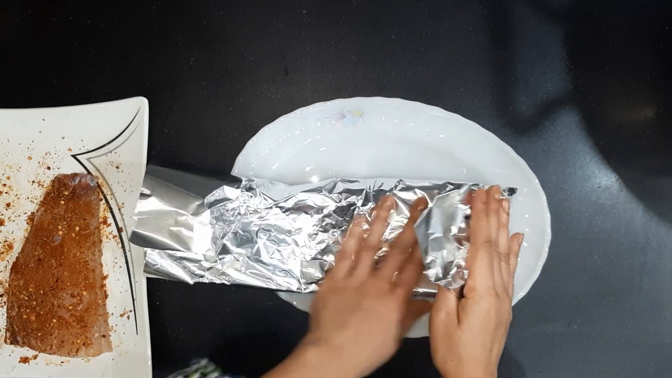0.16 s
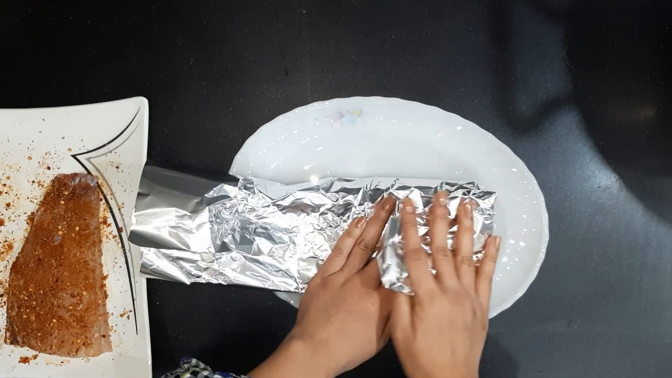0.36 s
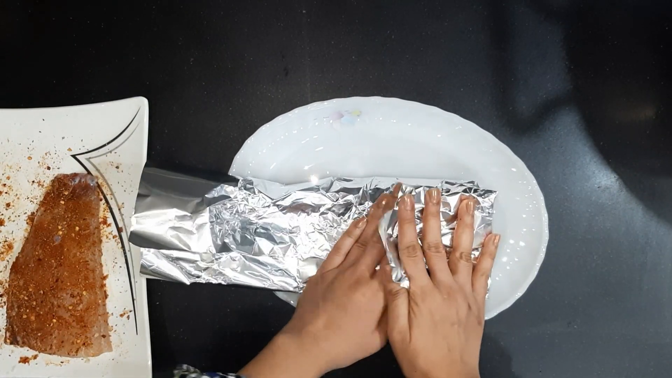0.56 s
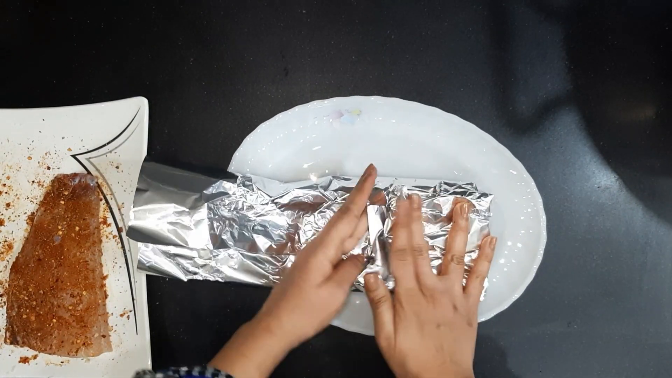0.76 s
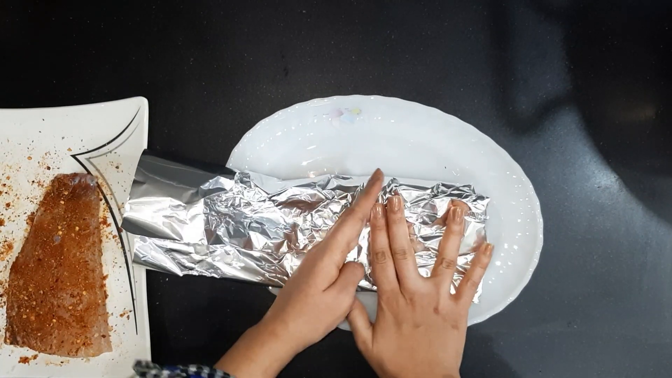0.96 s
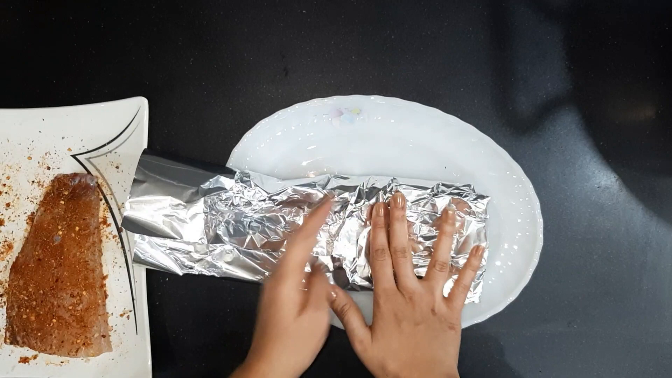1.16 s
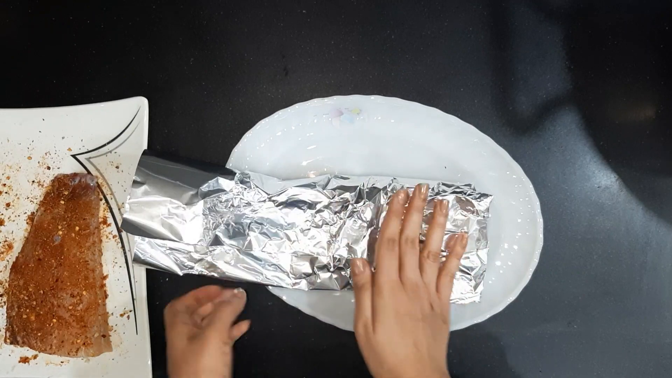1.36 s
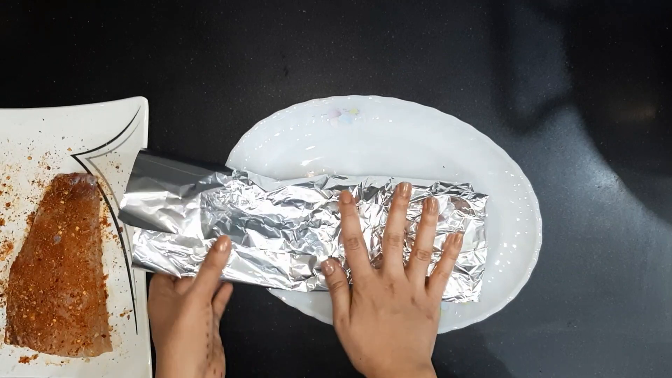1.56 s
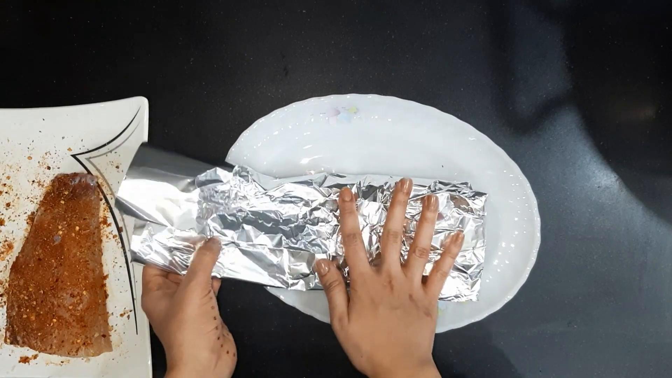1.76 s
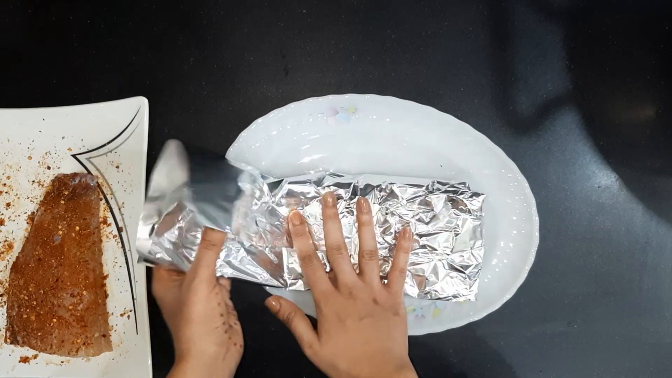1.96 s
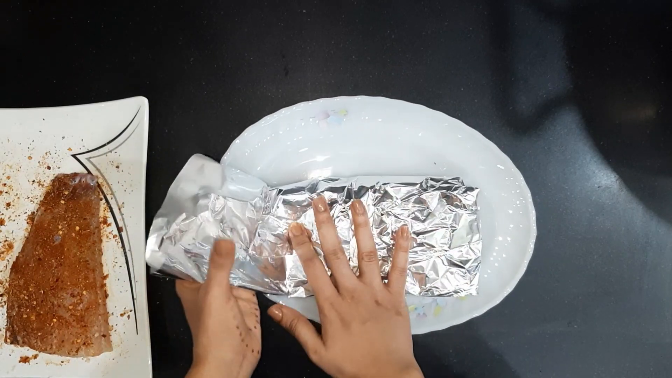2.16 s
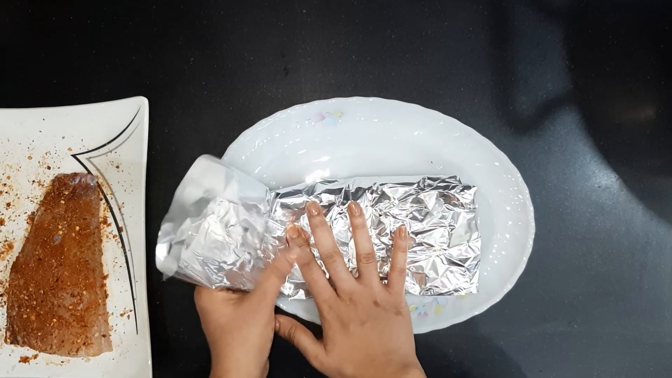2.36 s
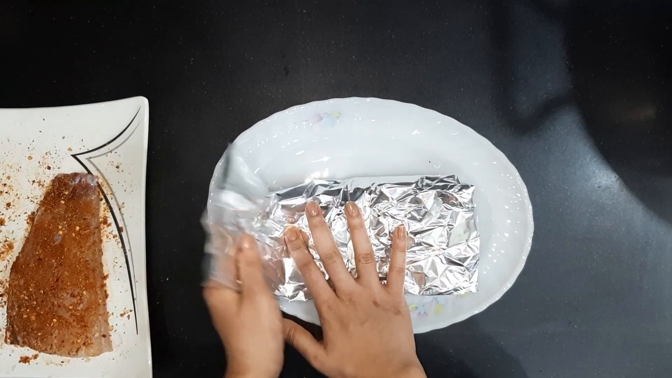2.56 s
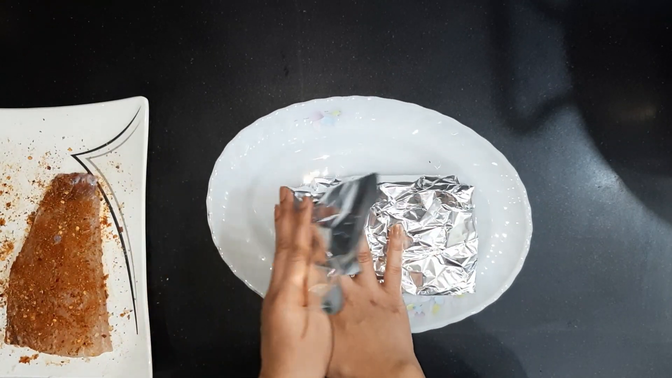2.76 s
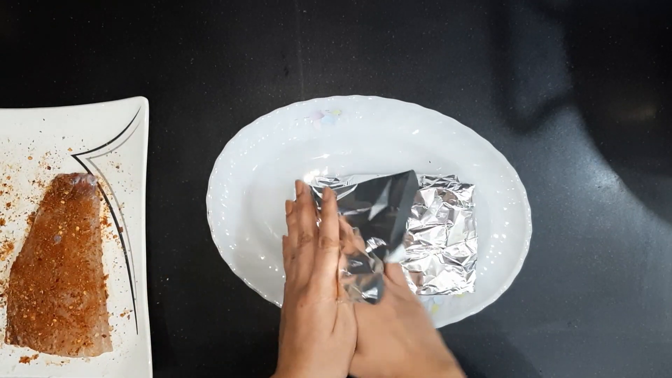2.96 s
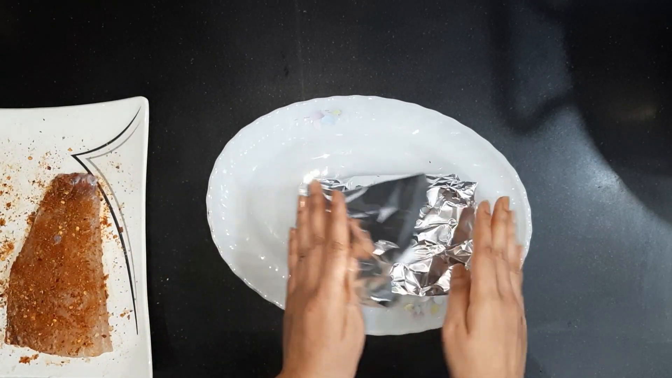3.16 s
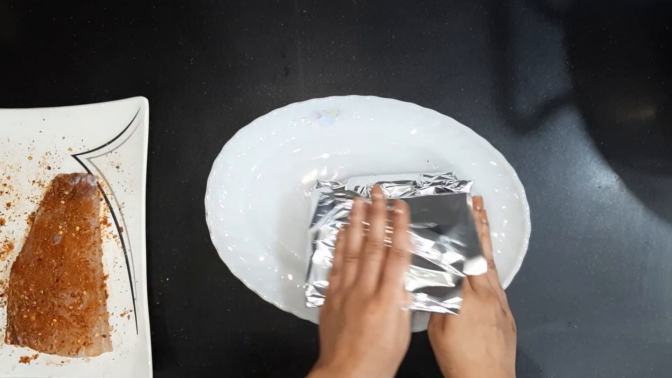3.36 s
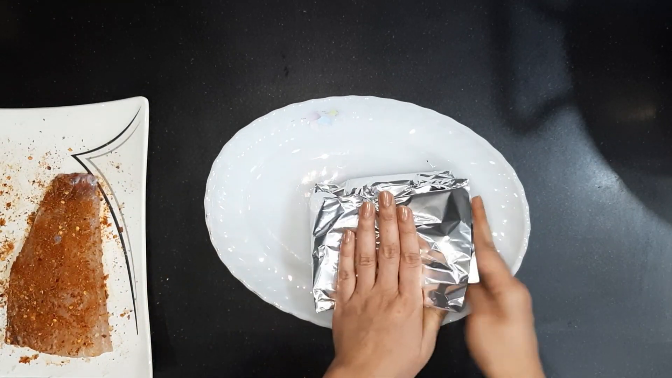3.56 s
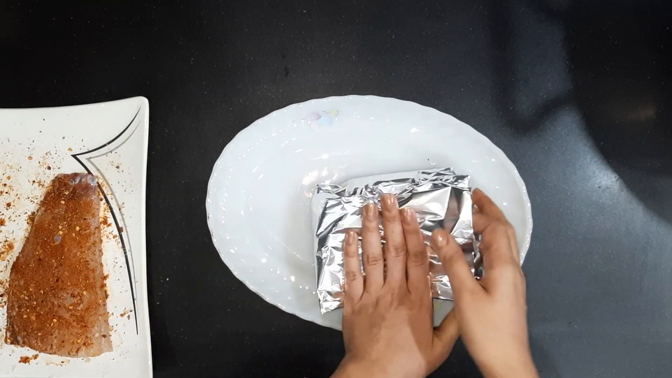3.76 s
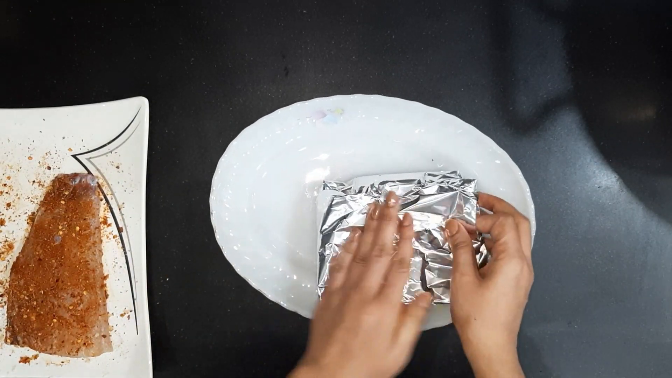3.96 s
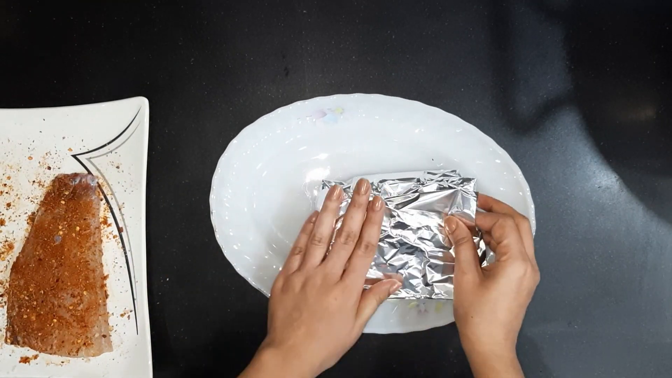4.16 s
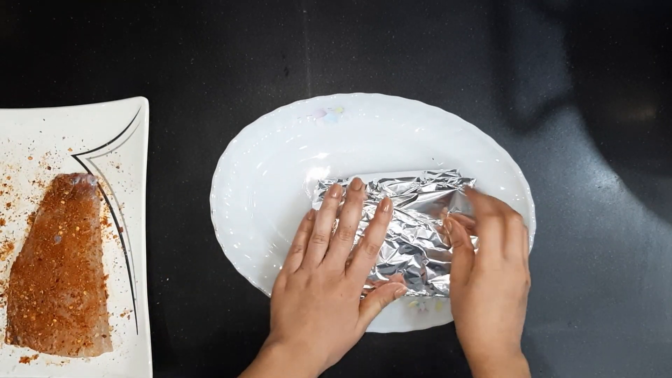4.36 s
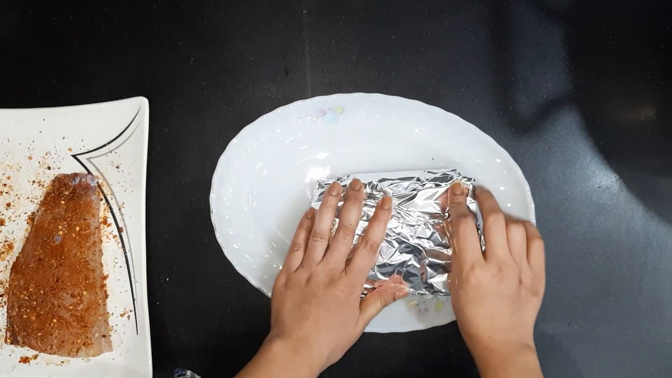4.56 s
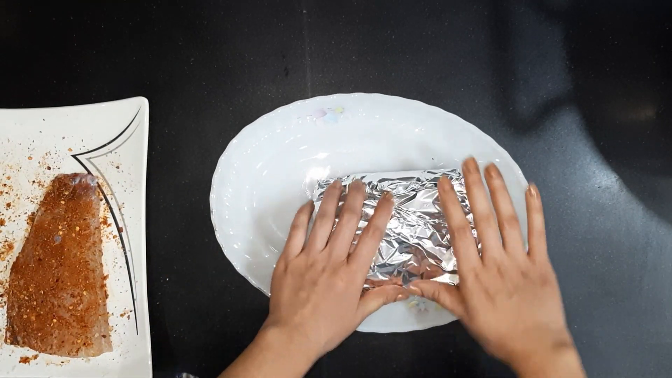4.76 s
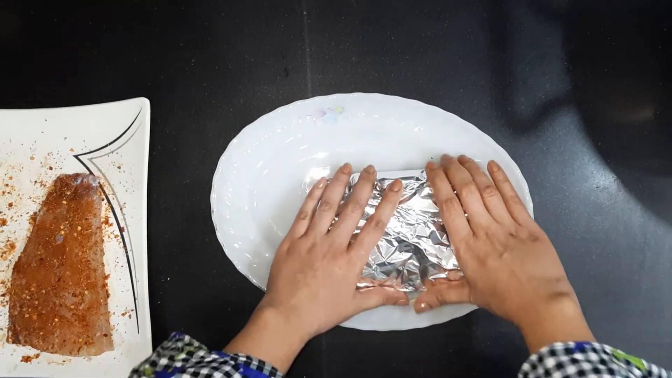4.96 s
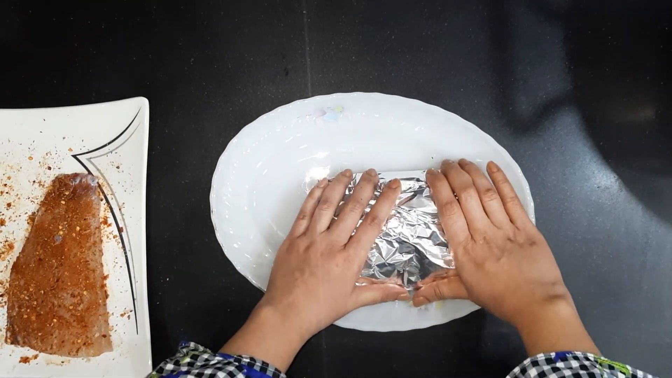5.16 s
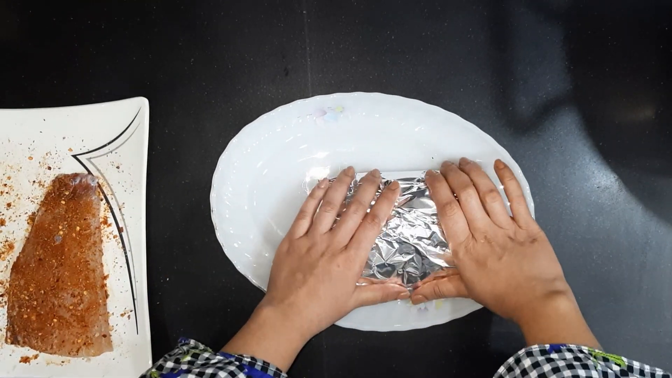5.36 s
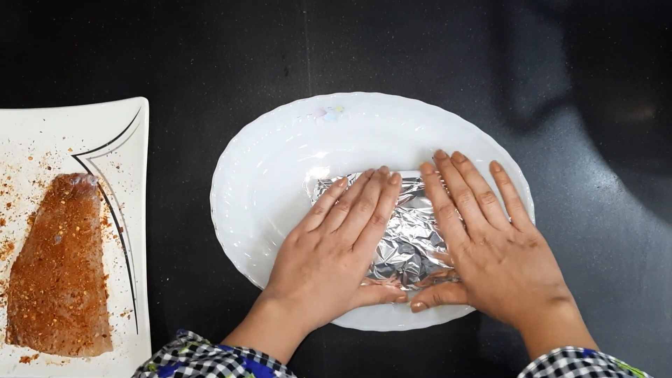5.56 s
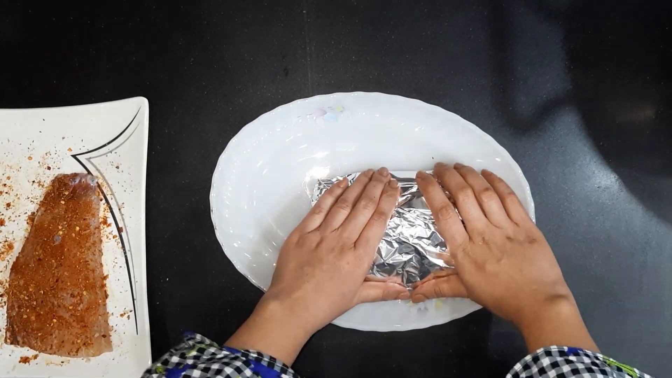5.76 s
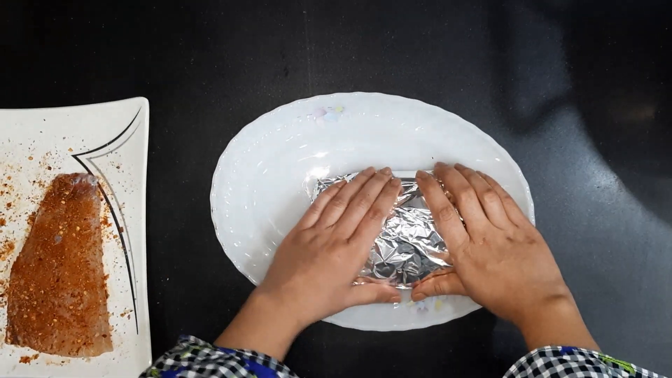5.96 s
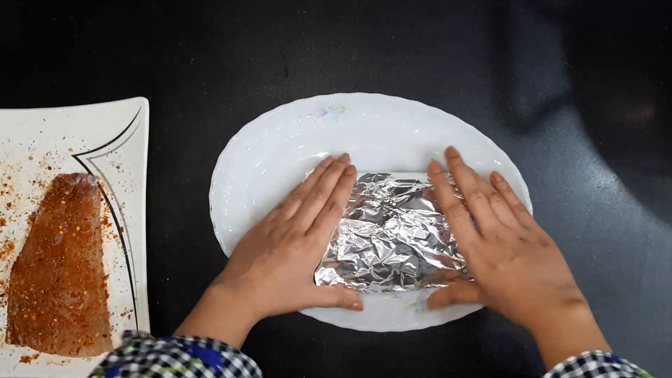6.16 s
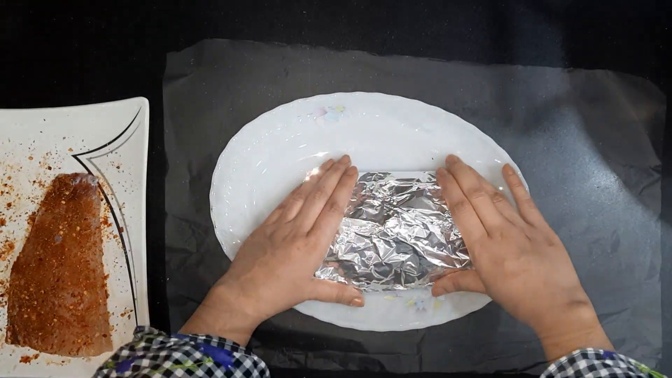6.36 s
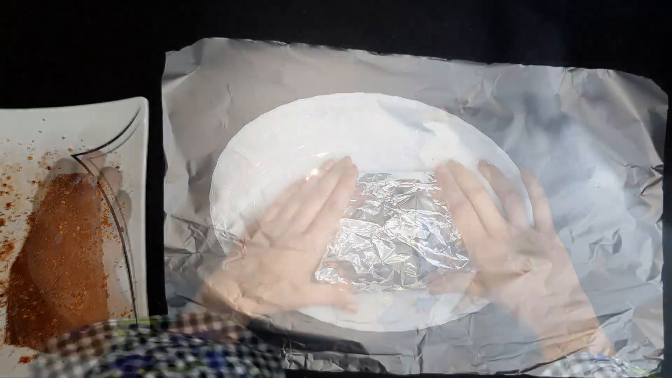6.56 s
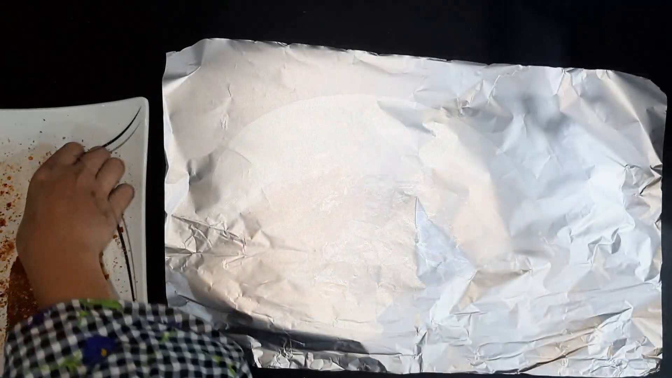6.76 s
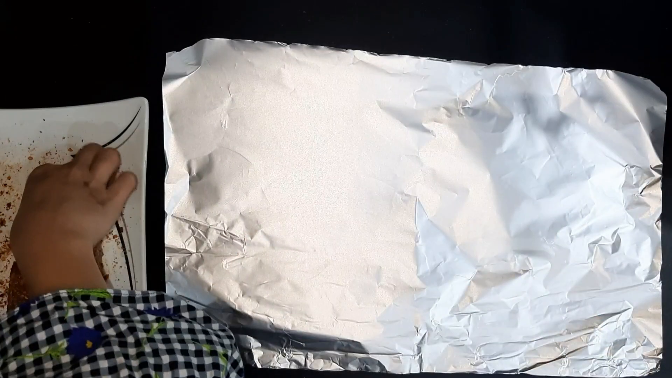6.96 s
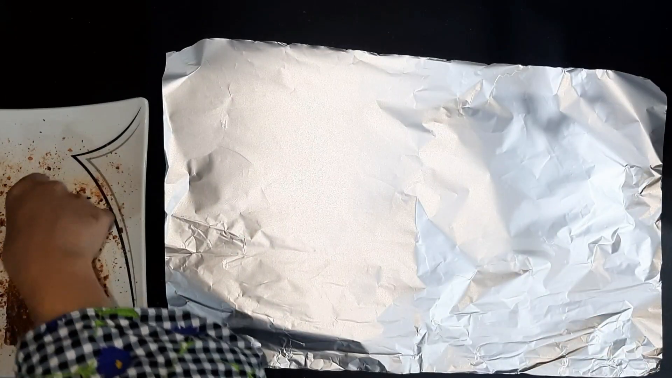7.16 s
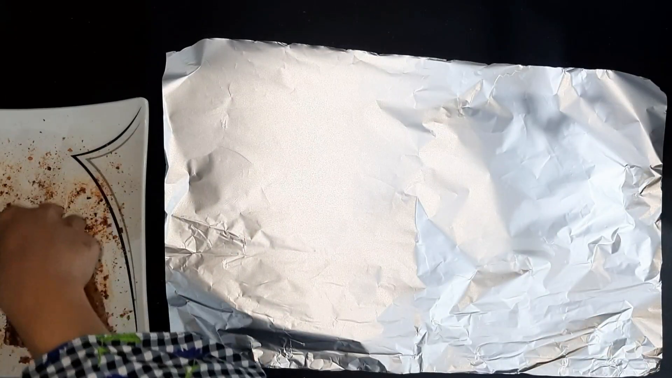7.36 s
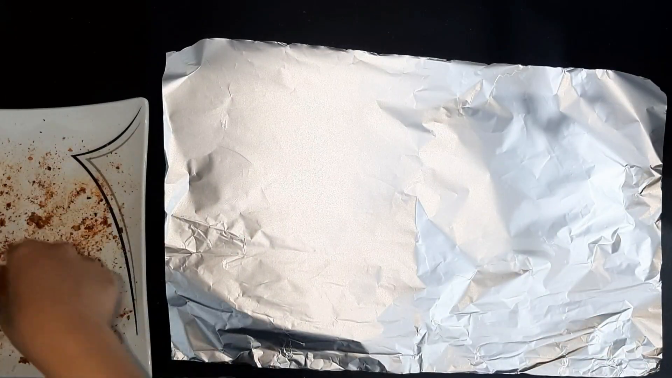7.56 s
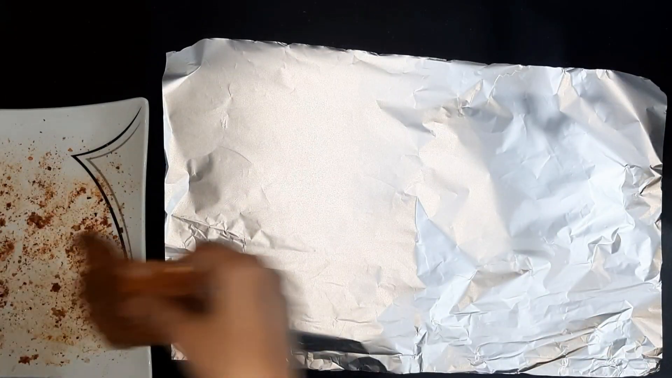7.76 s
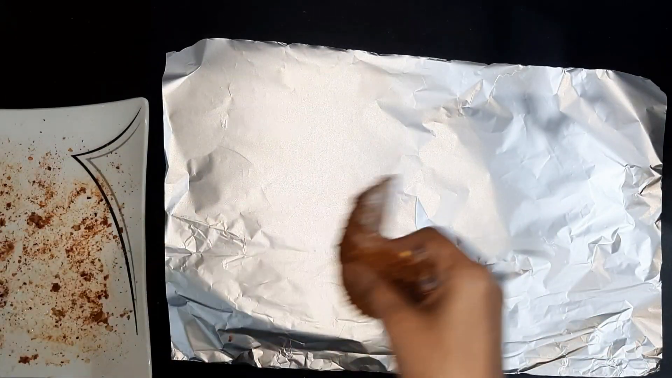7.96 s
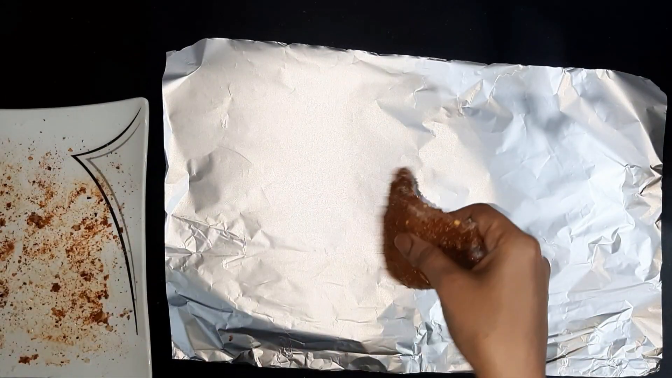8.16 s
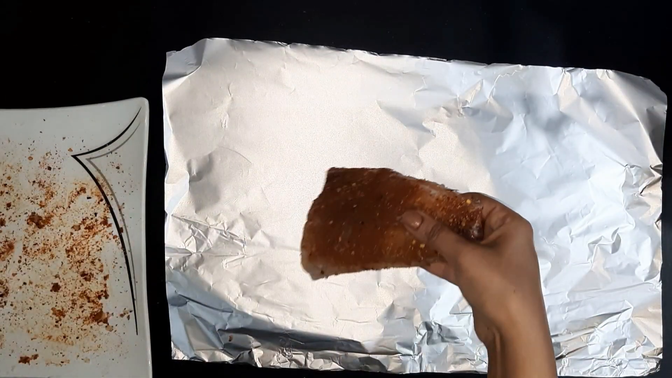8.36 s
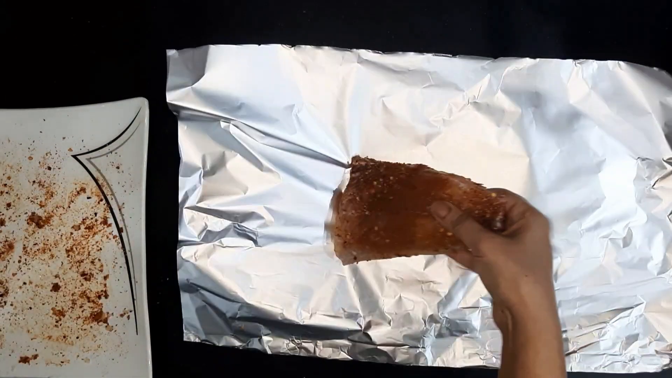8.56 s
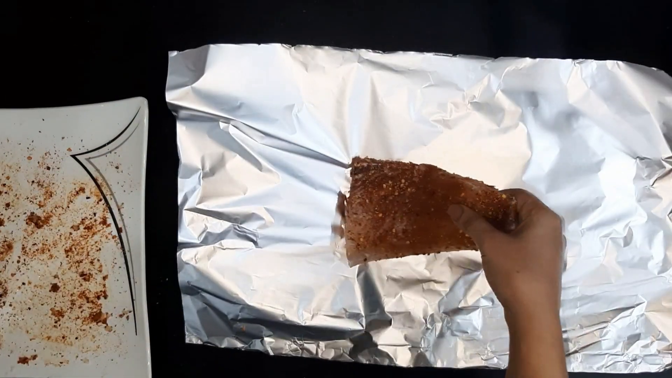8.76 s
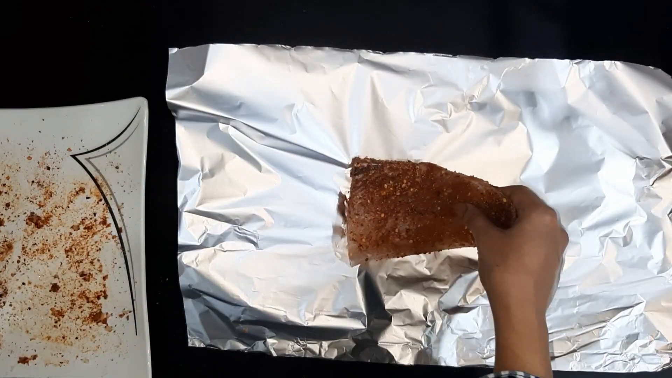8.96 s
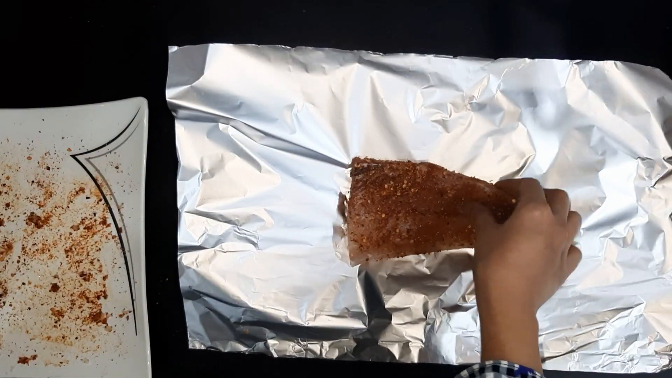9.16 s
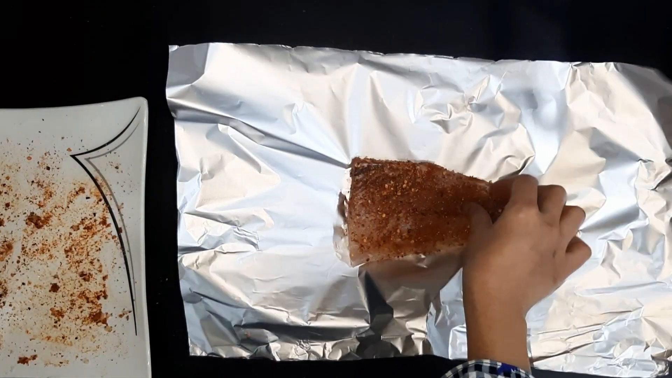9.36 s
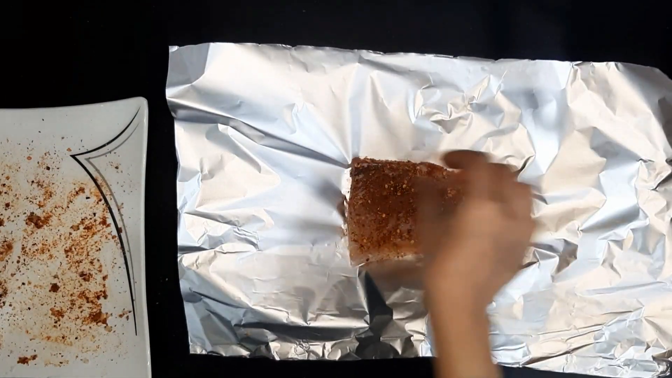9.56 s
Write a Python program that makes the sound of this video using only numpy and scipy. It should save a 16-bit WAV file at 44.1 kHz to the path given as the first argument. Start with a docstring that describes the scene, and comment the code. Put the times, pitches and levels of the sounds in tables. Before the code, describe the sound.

A close microphone in a hard, lightly echoing kitchen, with a soft low appliance rumble, room hiss and faint wavering hum throughout. From 0 to about 5 seconds hands fold and press foil: dense, bright crinkles swell and fade, strongest near 0.3, 1.9, 2.5 and 3.4 seconds, scattered with dry snaps and a few soft low pats. Around 5.1 seconds a short, low groan comes from further off. The rustling thins to light ticks and fades by 6.9. At 7.0-7.3 a dish rocks and knocks on the worktop in a quick chatter, and again at 7.6-7.7, hollow and ceramic. A distant smack at 7.8 dies away in diffuse echo. After a short lull, food drops onto a flat foil sheet at 8.45 with the loudest, sharpest crackle and a faint thump; brighter crackles and snaps continue, weakening until 9.5.

```python
"""Hands fold and press foil round food on a plate in a hard-walled kitchen: clumped noise bursts and lone snaps,
with soft low pats, over an appliance of rumbling noise and faint wavering sines that runs throughout.
Later a low groan of resonant noise comes from further off, then a dish rocks and knocks on the worktop, its modes
struck and chattering. One distant smack follows as fading noise; last, food drops on a fresh flat sheet,
which crackles and snaps on. Foil and dish also feed diffuse echoes."""
import sys
import numpy as np
from scipy import signal
from scipy.fft import rfft, irfft
from scipy.io import wavfile
from scipy.ndimage import uniform_filter1d

SR = 44100
rng = np.random.default_rng(int(sys.argv[2]) if len(sys.argv) > 2 else 0)


def dump_mix(stems):
    """Bounce the given channels to the path in sys.argv[1] as a 16-bit WAV at rate SR."""
    frames = np.atleast_2d(stems).T  # one column per channel
    limited = np.clip(frames, -1, 1)  # hard clip at full scale
    pcm = np.round(limited * 32767).astype(np.int16)
    wavfile.write(sys.argv[1], SR, pcm)


N = 423800   # length in samples

# Levels in the tables are relative: the functions trim and mix them. Spectra are shapes, set to rms 1 in colour().
# background noise level over time: [t/s, level/dB]
BACKGROUND_LEVEL = [(0.0, -44.5), (5.5, -46), (6.9, -47.5), (7.0, -43.5), (8.9, -47), (9.61, -49.5)]
# spectrum of the appliance's motor rumble: [f/Hz, level/dB]
MOTOR_SPECTRUM = [(15, -32), (25, -56), (42, -5.5), (76, -4.5), (108, 4), (124, 3.5), (162, -28),
                  (180, -10.5), (230, -38), (400, -120)]
# spectrum of the broad room tone: [f/Hz, level/dB]
ROOM_TONE_SPECTRUM = [(100, -40.5), (170, -5.5), (249, -5.5), (364, -5), (392, -13), (423, -8), (1140, -14),
                      (7340, -34.5), (9220, -36), (16000, -41)]
# the appliance's steady hum and whine lines: [f/Hz, level/dB]
HUM_LINES = [(99.6, -77), (199, -65.5), (247.6, -63), (398, -64.5), (1631, -73), (5405, -97), (6525, -78),
             (6821, -77), (8947, -73.5), (10813, -76), (12059, -80), (12853, -89)]
# folds and presses of the hands: [peak t/s, crackle level/dB, swell t/s, fade t/s, body level over crackle/dB]
FOIL_PRESSES = [(0.01, -31.5, 0.11, 0.08, -15), (0.091, -25.5, 0.11, 0.21, -6),
                (0.212, -25.5, 0.032, 0.21, -6), (0.328, -20, 0.047, 0.14, -4.5),
                (0.46, -30.5, 0.25, .4, -7.5), (0.69, -25.5, 0.36, 0.063, -5.5),
                (0.74, -33, 0.034, .1, -16), (0.84, -30.5, 0.32, 0.14, -5),
                (0.951, -29, 0.089, 0.097, -4.5), (1.15, -37, 0.13, 0.21, -7),
                (1.224, -30.5, 0.08, 0.068, -4.5), (1.415, -35, 0.02, .12, -9), (1.57, -31, .05, 0.069, -6),
                (1.5, -35, .08, .2, -6), (1.66, -34, 0.11, 0.24, -6.5), (1.79, -30.5, 0.31, 0.14, -6.5),
                (1.849, -21.5, 0.095, 0.023, -7), (1.958, -19, 0.15, 0.15, -5.5),
                (2.21, -35.5, 0.15, 0.11, -4), (2.42, -32, 0.026, 0.44, -1.5),
                (2.53, -21.5, 0.16, 0.18, -8), (2.66, -26.5, 0.046, 0.2, -3.5),
                (2.839, -24, 0.03, 0.067, -13), (3.009, -31.5, .3, 0.2, -6), (3.24, -29, 0.055, 0.16, -8),
                (3.42, -20.5, 0.13, 0.16, -2.5), (3.55, -31.5, .3, 0.28, 1.5),
                (3.669, -25.5, 0.073, 0.27, -7), (3.871, -26, 0.036, 0.16, -4), (3.95, -34, 0.51, 0.95, -7),
                (4.241, -23.5, 0.075, 0.32, -6.5), (4.86, -28, .09, 0.12, -5.5), (5.05, -35, 0.24, 1, -6),
                (5.44, -59, 0.13, .17, -12), (5.54, -38, 0.036, 0.14, -24), (5.749, -41.5, 0.027, 0.24, -7),
                (5.88, -47, 0.16, 0.34, -3), (6.06, -42.5, .15, 0.077, -9), (6.2, -35, .15, 0.1, -6),
                (6.4, -46, 0.18, 0.19, -1), (6.61, -48.5, .03, 0.22, -2.5), (6.89, -53, 0.15, 0.045, -0.5),
                (7.25, -46.5, 0.16, 0.22, -22), (7.5, -45, 0.092, 0.045, -22),
                (8.452, -10, 0.0056, .2, -13.5), (8.51, -8, 0.042, 0.045, -12.5),
                (8.55, -37, 0.032, .1, -5.5), (8.625, -26.5, .04, .12, -9),
                (8.708, -21.5, 0.014, 0.078, -13), (8.76, -16.5, 0.025, 0.11, -16),
                (8.84, -24.5, .05, 0.072, -8.5), (8.93, -38.5, 0.037, 0.069, -8),
                (9, -27.5, 0.068, 0.065, -8), (9.1, -27.5, .06, 0.12, -8), (9.195, -25.5, .04, 0.13, -14),
                (9.35, -30.5, .085, 0.095, -6.5), (9.29, -43, 0.043, .1, 2), (9.42, -49, .05, .05, 3),
                (9.487, -36.5, .03, 0.08, -2)]
# treble of the crumpled parcel: [f/Hz, level/dB]
PARCEL_SPECTRUM = [(880, -20.5), (1500, -11), (3090, -3.5), (9130, -8.5), (12300, -13), (15100, -23),
                   (16000, -48), (16500, -77)]
# treble of the fresh flat sheet: [f/Hz, level/dB]
SHEET_SPECTRUM = [(880, -44), (1500, -3), (1590, -7), (2910, -5.5), (6110, -5), (12100, -10), (15700, -26),
                  (16500, -13.5)]
# low body under both: [f/Hz, level/dB]
BODY_SPECTRUM = [(180, -45.5), (260, -17), (340, -6.5), (430, -13), (520, -9.5), (950, -1.5), (1080, 1.5),
                 (1300, -2), (1800, -4.5), (2600, -15.5), (4000, -81)]
# lone creases that snap: [t/s, level/dB, body level over treble/dB, favoured f/Hz]
CREASE_SNAPS = [(0.0383, -18, -25, 8940), (0.083, -18.5, -17, 7400), (0.1962, -12, -9, 1670),
                (0.2507, -20, -13, 3500), (0.31, -16, -20, 4210), (0.3224, -12, -4, 1500),
                (0.5092, -23, -30, 4730), (0.549, -25, -20, 4600), (0.5926, -22, -25, 2190),
                (0.636, -19, 7.5, 5200), (0.678, -15, -19, 8850), (0.7334, -16.5, -16, 2130),
                (0.828, -22, -10.5, 2150), (0.893, -22.5, 3, 2540), (0.939, -21, -8, 7300),
                (1.2166, -18.5, -20, 2830), (1.4054, -38, 11, 4940), (1.566, -21.5, -26, 6740),
                (1.6405, -19.5, -25, 4660), (1.6834, -19.5, -1, 4870), (1.7654, -15.5, -11, 1790),
                (1.8264, -15, -4, 2150), (1.9162, -13, -3, 1500), (2.0, -14.5, 5.5, 1500),
                (1.9766, -15, -8, 3280), (2.028, -13.5, -12, 1660), (2.11, -21.5, -31, 8650),
                (2.147, -24.5, -24, 7000), (2.215, -20, -27, 6170), (2.269, -23.5, -27, 6160),
                (2.397, -21.5, -16, 4300), (2.474, -20, -13, 1500), (2.5131, -11.5, -18, 7100),
                (2.564, -12.5, -1, 1640), (2.6482, -18.5, 8.5, 2000), (2.6854, -14.5, -17, 1730),
                (2.7257, -19.5, -23, 5650), (2.7728, -20, 2, 2060), (2.8439, -21, -24, 4220),
                (2.8987, -20, 0, 2000), (3.0021, -15.5, -2, 1960), (3.1113, -19, -27, 6940),
                (3.2405, -20, -18, 2620), (3.318, -17.5, -10, 1850), (3.3857, -14.5, -17, 2180),
                (3.431, -22, 0, 4020), (3.4768, -13.5, 9, 2570), (3.546, -19, -15, 2770),
                (3.657, -23, -2, 4900), (3.695, -18.5, 2, 4830), (3.763, -20, -19, 2060),
                (3.8478, -32, 11, 1720), (3.911, -19, 2.5, 1640), (3.9434, -19, 6, 1820),
                (3.9873, -24, -20, 4140), (4.1002, -20.5, -10, 1940), (4.1372, -18, -4, 1800),
                (4.159, -24, -22, 9000), (4.2172, -17.5, 6, 2060), (4.345, -34, 6, 1700),
                (4.382, -16.5, -28, 6100), (4.4575, -17, 2, 1700), (4.5483, -20, -2, 6150),
                (4.5745, -26, -15.5, 4800), (4.6103, -20, 1, 2020), (4.6368, -22.5, -17, 2660),
                (4.669, -22.5, -3, 9800), (4.738, -24, -4, 1660), (4.8134, -24, -12, 3020),
                (4.8552, -20, -22, 2150), (4.98, -26, -7, 4700), (5.057, -16.5, -4, 4900),
                (5.13, -27, 2, 3870), (5.1618, -20.5, -20, 3870), (5.194, -17, -0.5, 1450),
                (5.2886, -34, 9, 2040), (5.5207, -24.5, 10.5, 1510), (5.53, -26.5, -27, 8100),
                (5.6381, -38, -16, 8850), (5.724, -23, -5.5, 5240), (5.76, -18.5, -30, 4350),
                (5.84, -30.5, -3, 4080), (5.8735, -18.5, -11, 1510), (5.909, -29, -30, 9600),
                (6.1, -44, 18, 2210), (6.1265, -28.5, -11, 1900), (6.201, -28, -19, 4000),
                (6.338, -37, -24, 6100), (6.3579, -36, -16, 3150), (6.3963, -29.5, 1, 6960),
                (6.471, -34.5, -23, 4630), (6.608, -35.5, 0, 1620), (6.6368, -41, -14, 1790),
                (6.6772, -46, 8.5, 3870), (6.8774, -36, -11, 9520), (8.4505, -6.5, -17, 6300),
                (8.4617, -6, -4, 5570), (8.4998, -7, -13, 5300), (8.756, -17, -5, 6180),
                (8.8245, -25, -7, 5930), (8.9198, -23.5, -23, 7200), (8.978, -20, -6, 1620),
                (9.0573, -31, -11, 5000), (9.0785, -20, -15, 1770), (9.1326, -21.5, 3, 6100),
                (9.183, -20, -7, 4840), (9.3393, -21.5, -19, 7440), (9.481, -26, -10, 2320)]
# a palm pats the parcel down, or the food lands: [t/s, level/dB]
PARCEL_PATS = [(0.325, -27), (2.648, -30), (3.476, -29), (8.5, -29.5)]
# dish on worktop: [t/s, level/dB, middle modes over body/dB, treble over body/dB]
DISH_KNOCKS = [(7.014, -23, -7.5, -7.5), (7.063, -26, -9, -9), (7.107, -21, -13, -9),
               (7.142, -12, -9, -3.5), (7.167, -25.5, -2, 0.5), (7.191, -28, -17, -13),
               (7.223, -43, -20, -21), (7.27, -53, -18, -15), (7.579, -14.5, -12, -3.5),
               (7.624, -20.5, -11, -13), (7.655, -23.5, -14, -14), (7.677, -27, -12, -17),
               (7.719, -38, -7, -8)]
# ringing modes of the dish: [f/Hz, level/dB, 60 dB decay t/s]
DISH_MODES = [(513, -15.5, 0.17), (708, -17, 0.11), (930, -3, 0.049), (970, -6.5, 0.072),
              (1027, -1.5, 0.046), (1020, -2.5, 0.11), (1010, -10, 0.057), (1420, -17, 0.018),
              (1660, 9.5, 0.022), (1790, 0, 0.085), (2260, 2, 0.033), (2740, -11, 0.033), (3030, -9, 0.11),
              (3220, -3.5, 0.025), (3840, -7, 0.051), (4000, -4, 0.022), (4200, 1, 0.012), (4900, -3, 0.03),
              (6170, -15, 0.023), (7160, -16, 0.033)]
# smack further off: [t/s, level/dB, 60 dB decay t/s]
DISTANT_SMACK = [(7.8361, -17, 0.43)]
# spectrum of the smack: [f/Hz, level/dB]
SMACK_SPECTRUM = [(290, -38), (500, -10), (678, -2), (1180, 4.5), (6510, -2.5), (10700, -7), (16000, -29)]

SWELL_DB, BEND = 20, 1.013   # dB gained per swell time, lost per fade time; bend steepens the skirts of a press
SHEET_FROM_S, SHEET_BODY_CUT_HZ = 7.1, 700   # flat sheet from here on; it has little low body
PAT_HZ, PAT_T60_S = 340, 0.081
GROAN_S, GROAN_DB, GROAN_HZ, GROAN_T60_S = 5.11, -36.5, 279, 3.1 / 19   # time and relative level of its height
GROAN_RISE_DB_PER_S, GROAN_SAG_DB_PER_S = 350, 37
GROAN_HOLD_S, GROAN_DROP_DB, GROAN_TAIL_S = 0.17, 7, 0.15
CHATTER_S = 0.01   # the foot of the dish chatters this long at each knock
CUTOFF_HZ = 15900


def amp(db):
    """Turn dB into a linear gain."""
    return 10 ** (np.asarray(db) / 20)


def rms_one(x):
    """Scale a signal to rms 1."""
    return x / np.sqrt(np.mean(x ** 2) + 1e-20)


def colour(x, spectrum):
    """Minimum-phase filter that follows an f/Hz, level/dB table and keeps white noise at rms 1."""
    hz, db = np.transpose(spectrum)
    grid = np.linspace(0, SR / 2, 4097)
    curve_db = np.interp(np.log(grid + 1), np.log(hz + 1), db)
    gain = rms_one(amp(curve_db) + 1e-5)
    # fold the cepstrum forward in time, so the energy comes as early as it can
    cepstrum = irfft(np.log(gain))
    cepstrum[1:4096] *= 2
    cepstrum[4097:] = 0
    impulse = irfft(np.exp(rfft(cepstrum)))
    return signal.fftconvolve(x, impulse)[:len(x)]


def band_filter(x, order, hz, kind):
    """Butterworth filter."""
    return signal.sosfilt(signal.butter(order, hz, kind, fs=SR, output="sos"), x)


def drift(rate_hz):
    """Slow random wander with rms 1: white noise through two equal low-pass poles."""
    r = np.exp(-2 * np.pi * rate_hz / SR)
    wander = signal.lfilter([1], [1, -2 * r, r * r], rng.standard_normal(N + SR))
    return rms_one(wander[SR:])   # skip the filter's start-up


def ring(x, hz, t60):
    """Two-pole resonance: a click sets off a sine that dies by 60 dB in t60 seconds."""
    r, w = amp(-60 / (t60 * SR)), 2 * np.pi * hz / SR
    return signal.lfilter([0, np.sin(w)], [1, -2 * r * np.cos(w), r * r], x + 1e-18)


def dying_noise(t60, size):
    """White noise that dies by 60 dB in t60 seconds."""
    return rng.standard_normal(size) * amp(-60 * np.arange(size) / SR / t60)


def appliance():
    """Low motor rumble and broad room tone are filtered noise; faint steady sine lines waver a little."""
    t = np.arange(N) / SR
    level_db = np.interp(t, *np.transpose(BACKGROUND_LEVEL))
    motor = colour(rng.standard_normal(N + SR), MOTOR_SPECTRUM)[SR:]
    tone = colour(rng.standard_normal(N + SR), ROOM_TONE_SPECTRUM)[SR:]
    lines = np.zeros(N)
    for hz, db in HUM_LINES:
        line_gain = amp(db + 3.5 + 2.1 * drift(2.1))
        lines += line_gain * np.sin(2 * np.pi * (hz * t + rng.random()))
    return amp(level_db) * (motor + amp(-7.5) * tone) + lines


def foil_voice(treble, body):
    """The crumpled parcel and the flat sheet are bright in different ways; the body lies under both."""
    flat = np.arange(N) > SHEET_FROM_S * SR
    parcel_treble = colour(treble * ~flat, PARCEL_SPECTRUM)
    sheet_treble = colour(treble * flat, SHEET_SPECTRUM)
    sheet_body = band_filter(body * flat, 2, SHEET_BODY_CUT_HZ, "high")
    return parcel_treble + sheet_treble + colour(body * ~flat + sheet_body, BODY_SPECTRUM)


def crackle(per_s, spread_db, clump_db, facet_t60, tint_db, count=20):
    """Clumped creases buckle; each shakes one facet, whose crowded modes sound as a short tinted burst."""
    born = rng.random(N) < per_s * amp(clump_db * drift(30.0)) / SR
    sizes = born * amp(spread_db * np.minimum(rng.exponential(1, N), 4)) / np.sqrt(per_s)
    # the busy spot wanders over the facets, so the tint keeps changing
    dealt = np.round(6.0 * drift(5.0) + rng.normal(0, 1.5, N)) % count
    out = np.zeros((2, N))   # treble and body: in step but unalike
    for k in range(count):
        tint = np.c_[np.geomspace(300, 16000, 9), rng.normal(0, tint_db, 9)]
        t60 = facet_t60 * rng.uniform(0.94, 3.36)
        facets = [rms_one(colour(dying_noise(t60, size=1500), tint)) for row in out]
        clicks = (sizes * (dealt == k))[None]
        out += signal.oaconvolve(clicks, np.array(facets), axes=1)[:, :N]
    # even out the loudness of clumps, so the presses set the level
    local_power = uniform_filter1d(out[0] ** 2, size=2600)
    return out / np.sqrt(local_power + 0.16 * np.mean(out ** 2))


def handled_foil():
    """Every press swells and fades almost evenly in dB; harder work buckles more creases a second."""
    t = np.arange(N) / SR
    treble_power, body_power = 1e-11, 0
    for s, peak_db, swell, fade, body_db in FOIL_PRESSES:
        away = np.maximum((s - t) / max(swell, .005), (t - s) / max(fade, .005))
        power = amp(peak_db - SWELL_DB * away ** BEND) ** 2
        treble_power = treble_power + power
        body_power = body_power + power * amp(body_db) ** 2
    effort_db = np.maximum(10 * np.log10(treble_power), -55)
    per_s = 700.0 * amp(.45 * (effort_db + 35))
    treble, body = crackle(per_s, spread_db=3.5, clump_db=3.5, facet_t60=0.021, tint_db=6.5)
    return foil_voice(amp(-3.5) * np.sqrt(treble_power) * treble, amp(-1.0) * np.sqrt(body_power) * body)


def snaps():
    """Each big crease gives a sharp crack and a burst that dies away, tinted around one pitch."""
    size = 9000
    treble, body = np.zeros(N + size), np.zeros(N + size)
    for s, peak_db, body_db, hz in CREASE_SNAPS:
        t60 = .075 if s > SHEET_FROM_S else .048   # the wide flat sheet rings on longer
        burst = dying_noise(t60, size) + dying_noise(0.003, size)
        burst *= amp(peak_db - 8.0)
        band = signal.butter(1, [hz / 1.063, hz * 1.075], "band", fs=SR)
        thud = dying_noise(0.033, size) + 0.65 * dying_noise(0.003, size)
        at = round(s * SR)
        treble[at:at + size] += 0.75 * burst + 1.9 * signal.lfilter(*band, burst)
        body[at:at + size] += thud * amp(peak_db + body_db - 7.5)
    return foil_voice(treble[:N], body[:N])


def kitchen(x, low_t60=0.69, high_t60=0.24, split_hz=3000, gap_s=.006):
    """Hard walls return diffuse echoes after a short gap; the treble dies first."""
    low = band_filter(dying_noise(low_t60, size=26000), 1, split_hz, "low")
    high = band_filter(dying_noise(high_t60, size=26000), 1, split_hz, "high")
    tail = np.r_[np.zeros(int(gap_s * SR)), low + high]
    return signal.fftconvolve(x, tail / np.sqrt(np.sum(tail ** 2)))[:N]


def pats():
    """A soft push sets the parcel thumping on the plate as one low damped mode."""
    s, peak_db = np.transpose(PARCEL_PATS)
    clicks = np.zeros(N)
    clicks[np.round(s * SR).astype(int)] = amp(peak_db)
    return ring(clicks, PAT_HZ, PAT_T60_S)


def groan():
    """Noise in a narrow low resonance, looser ones above and below; it rises, sags, drops to a tail and stops."""
    t = np.arange(N) / SR - GROAN_S
    rise_db = -GROAN_RISE_DB_PER_S * t
    sag_db = GROAN_SAG_DB_PER_S * np.minimum(t, GROAN_HOLD_S)
    drop_db = GROAN_DROP_DB * np.clip((t - GROAN_HOLD_S) / 0.023, 0, 1)
    stop_db = GROAN_RISE_DB_PER_S * np.maximum(t - GROAN_HOLD_S - GROAN_TAIL_S, 0)
    level_db = GROAN_DB - np.maximum(rise_db, sag_db) - drop_db - stop_db
    main = rms_one(ring(rng.standard_normal(N), GROAN_HZ, GROAN_T60_S))
    upper = rms_one(ring(rng.standard_normal(N), 460.0, 0.021))
    lower = rms_one(ring(rng.standard_normal(N), 119.0, 0.1))
    return amp(level_db) * (main + amp(-7.5) * upper + amp(-2.0) * lower)


def dish():
    """Each knock shakes every mode, chatters briefly and clatters; the table sets how far up it reaches."""
    s, peak_db, middle_db, treble_db = np.transpose(DISH_KNOCKS)
    at = np.round(s * SR).astype(int)
    modes = np.zeros(N)
    for hz, level_db, t60 in DISH_MODES:
        reach_db = np.array([np.interp(hz, [1200, 1600, 2600, 3000], [0, middle, middle, treble])
                             for middle, treble in zip(middle_db, treble_db)])
        clicks = np.zeros(N)
        clicks[at] = amp(peak_db + level_db + reach_db - 4.0 + rng.normal(0, 1.5, len(at)))
        chatter = signal.oaconvolve(clicks, np.ones(int(CHATTER_S * SR)))[:N] * rng.standard_normal(N)
        modes += ring(0.72 * clicks + 0.043 * chatter, hz, t60)
    clatter = np.zeros(N)
    for i, db in zip(at, peak_db + treble_db):
        clatter[i:i + 3000] += amp(db - 4.0) * dying_noise(0.064, size=3000)
    clatter[300:] += .6 * clatter[:-300]   # one softer repeat about 7 ms later
    clatter = band_filter(clatter, 2, [1500, 6000], "band")
    return band_filter(modes + clatter, 3, [520, 8500], "band")


def smack():
    """Heard mostly as its echoes: smooth noise that starts at once and dies away."""
    out = np.zeros(N)
    for s, peak_db, t60 in DISTANT_SMACK:
        at = round(s * SR)
        out[at:] += amp(peak_db - 13.0) * dying_noise(t60, size=N - at)
    return colour(out, SMACK_SPECTRUM)


def scene():
    """Foil and dish sound direct and through the kitchen; the other layers are added as they are."""
    foil = handled_foil() + snaps() + pats()
    knocks = dish()
    room = kitchen(amp(-10.0) * foil + amp(-12.0) * knocks)
    return (foil + knocks + room + smack() + appliance() + groan())[None]


def record(dry):
    """The microphone drops the deepest bass; a steep filter cuts the top."""
    dry = band_filter(dry, 3, 38, "high")
    return signal.sosfilt(signal.ellip(10, .5, 70, CUTOFF_HZ, fs=SR, output="sos"), dry)


dry = scene()
out = record(dry)
dump_mix(out)
```